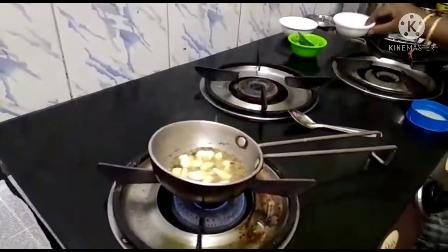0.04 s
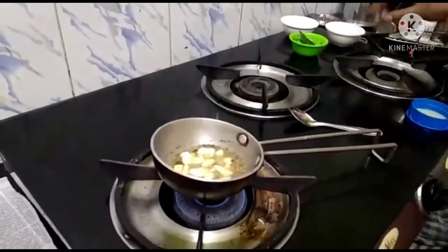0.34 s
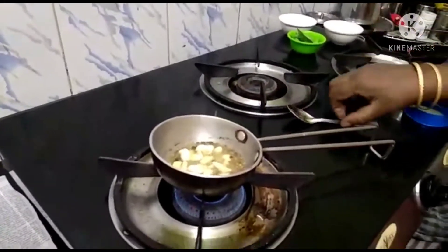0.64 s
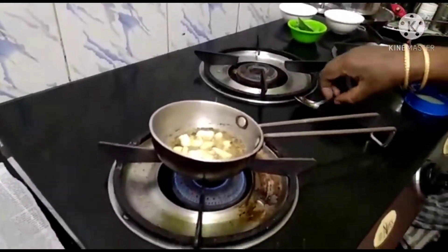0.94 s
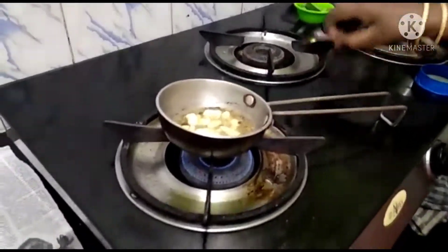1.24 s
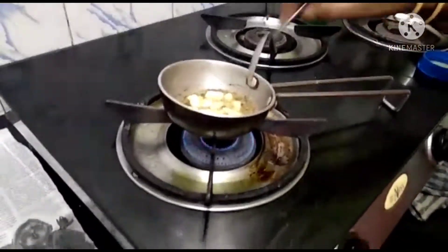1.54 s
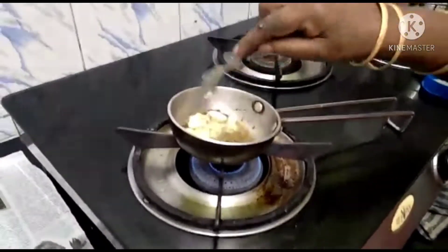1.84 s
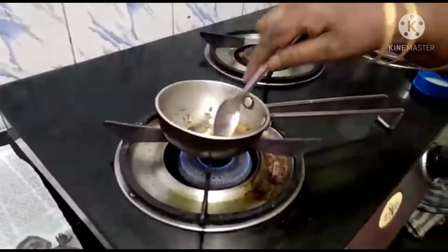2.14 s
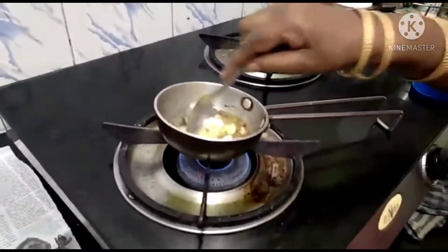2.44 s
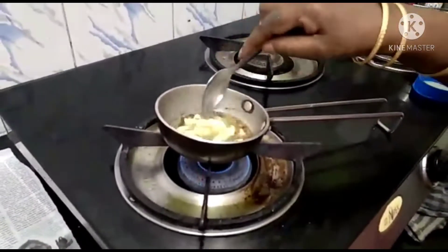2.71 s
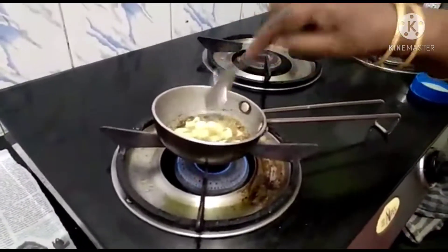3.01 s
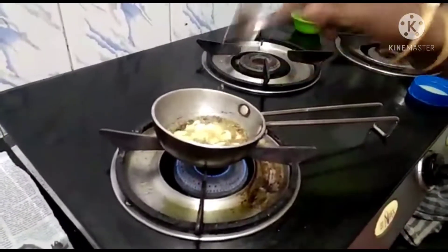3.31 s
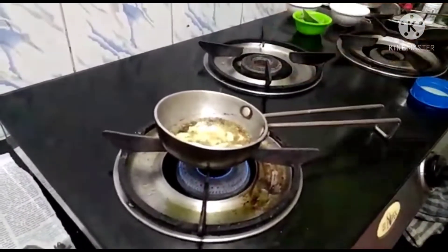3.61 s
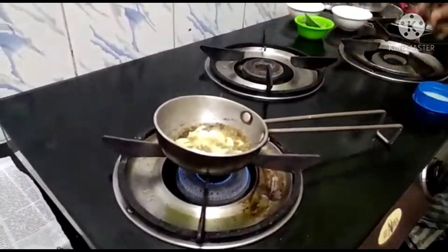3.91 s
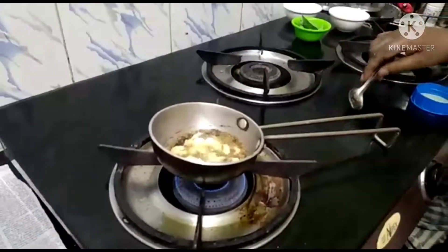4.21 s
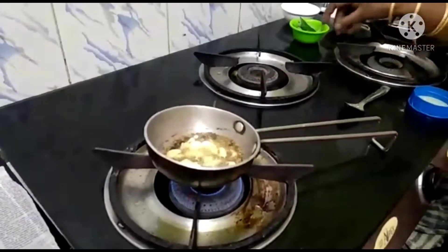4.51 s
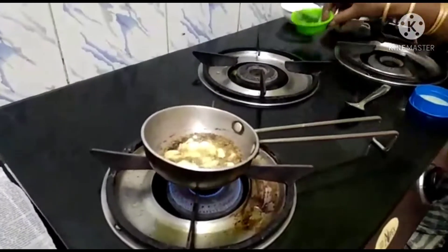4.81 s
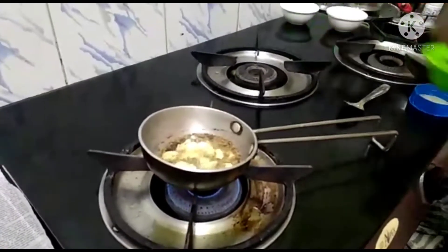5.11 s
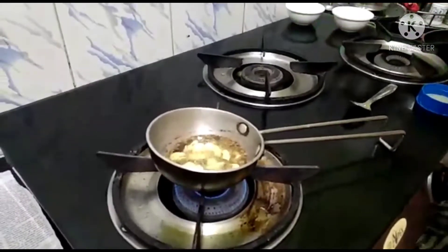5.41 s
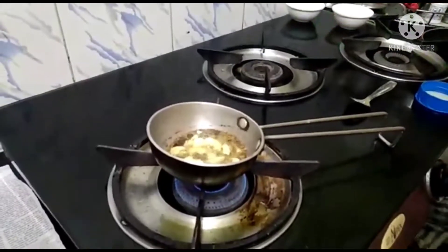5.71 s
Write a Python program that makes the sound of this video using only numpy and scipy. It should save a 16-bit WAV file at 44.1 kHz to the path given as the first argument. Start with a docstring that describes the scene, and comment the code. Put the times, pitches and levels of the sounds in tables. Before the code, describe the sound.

Nuts sizzle faintly in a pan as a bowl clanks down, a steel spoon clinks and stirs, then drops with a ringing clatter.

```python
"""Frying nuts in ghee

Nuts fry quietly in a small steel pan on a gas stove in a tiled kitchen, tiny steam bubbles popping.
A bowl clanks down on the stove and rocks to rest. A steel spoon is picked up, clinks and scrapes
round the pan, then drops on the stove top, where it bounces and rings."""
import sys
import numpy as np
from scipy import signal
from scipy.fft import rfft, irfft, next_fast_len
from scipy.io import wavfile
from scipy.ndimage import uniform_filter1d

SR = 44100
rng = np.random.default_rng(int(sys.argv[2]) if len(sys.argv) > 2 else 0)


def wav_out(sig):
    """Save sig, one row per channel (or a flat mono array), as 16-bit PCM at SR to the path in sys.argv[1]."""
    wavfile.write(sys.argv[1], SR, np.round(np.clip(np.atleast_2d(sig).T, -1, 1) * 32767).astype(np.int16))


N = 262395
TIME = np.arange(N) / SR
CUTOFF_HZ = 15550
HARD_CRACK = 1.5   # steel on steel: the clean crack against the slips around it
BOWL_BOUNCE_S, SPOON_BOUNCE_S = 0.011, 0.013


def from_db(db):
    """Decibels to gain."""
    return 10 ** (np.asarray(db) / 20)


def unit_energy(x):
    """Scale to an energy of one per channel."""
    return x / np.sqrt(np.mean(np.sum(x ** 2, axis=-1)) + 1e-20)


def unit_rms(x):
    """Scale to an rms of one."""
    return unit_energy(x) * np.sqrt(x.shape[-1])


def colour(x, spectrum):
    """EQ a sound with a smooth curve of (frequency [Hz], gain [dB])."""
    hz, db = np.transpose(spectrum)
    size = next_fast_len(x.shape[-1])
    bins = np.maximum(np.fft.rfftfreq(size, 1 / SR), 1)
    gain = from_db(np.interp(np.log(bins), np.log(hz), db))
    return irfft(rfft(x, size) * gain, size)[..., :x.shape[-1]]


def through(x, response):
    """Convolve with an impulse response."""
    return signal.fftconvolve(np.atleast_2d(x), np.atleast_2d(response), axes=-1)[:, :N]


def ringing(modes):
    """Impulse response of damped modes: the wider the mode, the shorter its ring."""
    t = TIME[:SR // 2]
    response = 0
    for k, (hz, width, db) in enumerate(modes):
        envelope = from_db(db) * width * np.exp(-np.pi * width * t)
        response += (-1) ** k * envelope * np.sin(2 * np.pi * hz * t)
    return unit_energy(response)


def dense_modes(force, spectrum):
    """Pass a force through crowded, quickly damped modes: a broad EQ of unit energy."""
    impulse = signal.unit_impulse(SR // 10, "mid")
    return colour(force, spectrum) / np.linalg.norm(colour(impulse, spectrum))


def swell(t, rise_s, fall_s):
    """An envelope that builds toward time zero, then dies away."""
    return np.exp(-np.logaddexp(-t / rise_s, t / fall_s))


def grains(per_s):
    """Random clicks of either sign, at an rms of one."""
    return unit_rms((rng.random(N) < per_s / SR) * rng.choice([-1, 1], N))


def add(track, s, sound):
    """Mix a sound in, centred on a time."""
    at = round(s * SR) - len(sound) // 2 + np.arange(len(sound))
    inside = (at >= 0) & (at < N)
    track[at[inside]] += sound[inside]


def contact(fall_s, rise_s, crack=0):
    """One touch: tiny slips thicken and die away; a hard touch has a clean crack in the middle."""
    t = np.arange(-(SR // 10), SR // 10) / SR
    slips = unit_energy(rng.standard_normal(len(t)) * swell(t, rise_s, fall_s))
    return unit_energy(slips + crack * signal.unit_impulse(len(t), "mid"))


def blows(times, levels_db, fall_s, rise_s, crack=0):
    """The force of a series of touches."""
    force = np.zeros(N)
    for s, db in zip(times, levels_db):
        add(force, s, from_db(db) * contact(fall_s, rise_s, crack))
    return force


def chatter(times, levels_db, losses_db, gap_s, fall_s, rise_s, crack=0):
    """The force of landings that each break into six uneven, ever weaker bounces."""
    bounce = np.arange(6)[:, None]
    bounce_times = times + gap_s * bounce * rng.uniform(.95, 1.05, bounce.shape)
    bounce_db = levels_db - losses_db * bounce
    return blows(bounce_times.ravel(), bounce_db.ravel(), fall_s, rise_s, crack)


def stereo(mid, side, bass_side_db, wide_above_hz=5040):
    """Mid and side to left and right: narrow in the bass, wide in the treble."""
    side = colour(side, [(wide_above_hz * .9, bass_side_db), (wide_above_hz, -3)])
    return np.array([mid + side, mid - side])


def flicker(depth_db, per_s):
    """A small random rise and fall in gain."""
    knots = rng.standard_normal(1000)
    return from_db(depth_db * np.interp(TIME * per_s, np.arange(len(knots)), knots))


# Tone of the frying ghee: (frequency [Hz], gain [dB])
SIZZLE_EQ = [(530, -47), (900, -31.5), (1100, -1), (1260, -12), (1600, -7.5), (1950, -4.5), (3000, -9.5),
             (3430, -2), (3800, -5), (4200, -2), (4900, -10.5), (5600, -11.5), (6900, -1.5), (7600, -4),
             (8900, 2), (9300, -5.5), (9900, -2.5), (10700, -0.5), (12700, -9), (13800, -7), (15500, -4)]

def sizzle(level_db=-59.5, pops_per_s=500, size_spread_db=2.5, pops_db=-7, bands=10):
    """Tiny steam bubbles burst in the ghee; the level flickers, each frequency band separately."""
    strengths = from_db(size_spread_db * np.minimum(rng.exponential(1, (2, N)), 4))
    pops = unit_rms(strengths * [grains(pops_per_s), grains(pops_per_s)])
    hiss = unit_rms(stereo(*rng.standard_normal((2, N)), bass_side_db=-20))
    spectrum = rfft(colour(hiss + from_db(pops_db) * pops, SIZZLE_EQ))
    band = np.arange(spectrum.shape[-1]) * SR / N // (CUTOFF_HZ / bands)
    frying = sum(irfft(spectrum * (band == k), N) * flicker(depth_db=2, per_s=32) for k in range(bands))
    return from_db(level_db) * flicker(depth_db=0.8, per_s=15) * unit_rms(frying)


# Tone of the gas flame: (frequency [Hz], gain [dB])
FLAME_EQ = [(29, -89), (50, -62), (119, -18), (145, -13), (199, -7), (313, 1), (353, -29.5), (414, -2),
            (548, 1), (578, -28), (617, 0.5), (764, -12), (1200, -21), (1560, -59.5), (2640, -120)]

def flame(level_db=-70):
    """The soft, low rush of the burner."""
    noise = stereo(*rng.standard_normal((2, N)), bass_side_db=-18)
    return from_db(level_db) * unit_rms(colour(noise, FLAME_EQ))


# Room tone of the kitchen: (frequency [Hz], level [dB])
HUM_TONES = [(283, -80), (316, -73.5), (543, -84.5), (615, -80)]

def hum(width_hz=6):
    """A faint, wavering hum: noise rings narrow resonances."""
    return sum(from_db(db) * unit_rms(through(rng.standard_normal(N), ringing([(hz, width_hz, 0)])))
               for hz, db in HUM_TONES)


# Bright ticks of spoon, bangles and bowls:
# (time [s], level [dB], decay [s], pitch [Hz], peak sharpness [factor])
LIGHT_TICKS = [(0.091, -6.5, 0.025, 3760, 1.8), (0.117, -2, 0.012, 8100, 1.5),
               (0.394, 3, 0.0041, 9200, 0.47), (0.435, -9.5, 0.0046, 8500, 0.38),
               (0.721, -15, 0.014, 8500, 0.13), (1.01, -12.5, 0.0057, 9100, 0.61),
               (1.293, -10, 0.0053, 8050, 0.64), (1.379, -11, 0.016, 8200, 0.8),
               (1.414, 7.5, 0.0021, 8800, 0.87), (2.514, -15.5, 0.0042, 8000, 1.4),
               (2.589, -19, 0.0067, 6900, 1.05), (3.05, -13.5, 0.0049, 6930, 0.99),
               (3.426, -10, 0.0049, 8950, 1.4), (3.53, -18.5, 0.004, 6870, 2.4),
               (4.135, 7, 0.0035, 7330, 1.4)]
# A tick's peak at a sharpness of one: (frequency [multiple of pitch], gain [dB])
TICK_EQ = [(0.02, -45), (0.08, -40), (0.25, -17.5), (0.52, -14), (0.998, 0.5), (1.502, -10), (2.2, -14.5)]
# Duller knocks of pan and dishes: (time [s], level [dB], decay [s], upper edge [Hz])
DISH_KNOCKS = [(0.036, -15.5, 0.0023, 4470), (0.409, -2.5, 0.082, 2030), (1.041, -20, 0.0047, 1880),
               (1.126, -6.5, 0.023, 4130), (2.214, -21.5, 0.0038, 1477), (2.951, -17.5, 0.0085, 700),
               (3.01, -44, 0.0091, 906), (3.496, -23.5, 0.0034, 1120), (3.594, -17.5, 0.0044, 5030),
               (4.226, -4.5, 0.0057, 1710), (4.318, -6, 0.0031, 2210), (4.408, -7.5, 0.0038, 4100),
               (4.621, -14, 0.0027, 7340)]
# Ring of the stove top: (frequency [Hz], width [Hz], level [dB])
STOVE_RING = [(484, 24, -3), (692, 30, -3), (1105, 110, -8), (1490, 55, -9), (1950, 200, -6)]

def clatter(gain_db=-1, stove_db=-14):
    """Ticks peak at their pitch, knocks are flat up to their edge; the stove rings faintly with both."""
    force = np.zeros(N)
    for s, db, fall_s, pitch_hz, sharpness in LIGHT_TICKS:
        eq = [(multiple * pitch_hz, sharpness * eq_db) for multiple, eq_db in TICK_EQ]
        add(force, s, from_db(db) * colour(contact(fall_s, rise_s=0.0028), eq))
    for s, db, fall_s, edge_hz in DISH_KNOCKS:
        eq = [(60, -45), (150, -19), (450, 0), (edge_hz, 0), (4 * edge_hz, -34)]
        add(force, s, from_db(db) * colour(contact(fall_s, rise_s=0.0072), eq))
    stove = from_db(stove_db) * through(force, ringing(STOVE_RING))
    return from_db(gain_db) * (force + stove)


# The bowl rattles down on its foot: (time [s], body level [dB], edge level [dB], loss per bounce [dB])
BOWL_HITS = [(0.173, -12, -22, 9), (0.179, -4.5, -16, 11), (0.19, -9, -17, 8), (0.213, -8.5, -19.5, 8),
             (0.229, -8, -20, 7), (0.256, -19, -30, 10), (0.266, -18, -29, 9)]
# Ring of its wall and of its edge: (frequency [Hz], width [Hz], level [dB])
WALL_RING = [(1741, 34, -4), (1869, 36, -4), (1935, 36, -4), (1971, 38, 0), (2010, 45, -3), (2110, 40, -6),
             (2221, 34, 0), (2341, 34, -5), (2457, 30, -1), (2483, 30, -3), (2538, 34, -5), (2618, 32, -2),
             (2777, 36, -9), (2889, 32, -3), (3070, 40, -11), (3318, 36, -10), (3645, 28, -2),
             (3668, 30, -1), (3900, 60, -10), (4080, 34, -11), (4307, 55, -9), (4430, 60, -10)]
EDGE_RING = [(4940, 150, -11), (6410, 45, 0), (6650, 120, -7), (7740, 50, -8), (8190, 70, 1), (8480, 45, 2),
             (8764, 35, -1), (10400, 90, 0), (10750, 150, -4), (11200, 35, 1), (11970, 70, 1),
             (15200, 70, -9)]
# Dense modes of its body and of its edge: (frequency [Hz], gain [dB])
BODY_EQ = [(100, -48), (250, -27.5), (400, -9.5), (520, -7.5), (900, -2.5), (1500, -0.5), (2100, 17.5),
           (3000, 6.5), (4400, -10.5), (5200, -10.5), (8000, -15.5), (16000, -45)]
EDGE_EQ = [(3000, -30.5), (4900, -9), (5700, -22), (6500, 4), (7400, -4.5), (8500, 15), (9500, -14.5),
           (10400, 5), (12000, -2.5), (13200, 0), (15500, -17.5)]

def bowl_clank(wall_db=14, stove_db=9, body_db=15.5, edge_db=15):
    """The bowl clanks down: its wall and the stove ring low, its edge rings high."""
    s, body, edge, loss = np.transpose(BOWL_HITS)
    touch = dict(gap_s=BOWL_BOUNCE_S, fall_s=0.0014, rise_s=0.0027, crack=HARD_CRACK)
    # the wall's ring and the body's clank each get their own noise, at the same hits
    ring_force, body_force = (chatter(s, body, loss, **touch) for _ in range(2))
    edge_force = chatter(s, edge + edge_db, loss, **touch)
    response = from_db(wall_db) * ringing(WALL_RING) + from_db(stove_db) * ringing(STOVE_RING)
    clank = through(ring_force, response) + from_db(body_db) * dense_modes(body_force, BODY_EQ)
    shimmer = through(edge_force, ringing(EDGE_RING)) + from_db(1) * dense_modes(edge_force, EDGE_EQ)
    return clank + shimmer


# Rolls of the bowl on its foot: (time [s], level [dB], decay [s])
BOWL_ROLLS = [(0.3, -39, 0.1), (0.492, -33.5, 0.024), (0.523, -27.5, 0.016), (0.555, -28.5, 0.011),
              (0.609, -31.5, 0.03)]
# Ring of the bowl against the stove: (frequency [Hz], width [Hz], level [dB])
ROLL_RING = [(479, 32, -10), (694, 32, -7), (1110, 60, -11), (1500, 35, -14), (1790, 90, -10),
             (2000, 60, -4), (2220, 35, -7), (2450, 60, -6), (2620, 30, -8), (2900, 45, -9),
             (3410, 170, -16), (4130, 200, -22)]

def bowl_rocking(ring_db=-5, body_db=-8, edge_db=-24, slips_per_s=800):
    """The bowl judders to rest, each roll a burst of slips that ring and rasp."""
    roll = sum(from_db(db) * swell(TIME - s, 0.0034, fall_s) for s, db, fall_s in BOWL_ROLLS)
    ring = from_db(ring_db) * through(roll * grains(slips_per_s), ringing(ROLL_RING))
    rasp = roll * grains(slips_per_s)
    body = from_db(body_db) * dense_modes(rasp, BODY_EQ)
    edge = from_db(edge_db) * dense_modes(rasp, EDGE_EQ)
    return ring + body + edge


def lone_rings(notes, rise_s, waver_hz):
    """Touches that each set one resonance singing, its pitch not quite steady."""
    track = np.zeros(N)
    t = np.arange(-(SR // 5), SR // 5) / SR
    for s, hz, db, fall_s in notes:
        waver = unit_rms(uniform_filter1d(rng.standard_normal(len(t)), size=400))
        tone = np.sin(2 * np.pi * np.cumsum(hz + waver_hz * waver) / SR)
        add(track, s, from_db(db) * swell(t, rise_s, fall_s) * tone)
    return track


# Squeaks of the rocking bowl: (time [s], pitch [Hz], level [dB], decay [s])
SQUEAKS = [(0.484, 1940, -33, 0.013), (0.523, 1957, -27.5, 0.016), (0.554, 2000, -24.5, 0.011),
           (0.59, 2027, -35, 0.042), (0.66, 1980, -36.5, 0.0093)]

def bowl_squeaks():
    """The foot sticks and slips, and the wall sings near one pitch."""
    return lone_rings(SQUEAKS, rise_s=0.0037, waver_hz=17)


# Fingers nudge and lift the spoon: (time [s], ring level [dB], knock level [dB], loss per bounce [dB])
LIFT_HITS = [(0.773, -30.5, -36, 5), (1.098, -28, -47, 20), (1.107, -21.5, -29, 3), (1.144, -32, -32.5, 12)]
# Choked ring of the held spoon: (frequency [Hz], width [Hz], level [dB])
HELD_RING = [(3620, 130, -14), (5440, 120, -11), (6770, 50, -12), (7820, 55, 2), (8860, 60, -2),
             (10300, 70, -10), (10800, 70, -1), (11220, 130, 2), (11900, 200, -11), (14600, 220, -10)]

def spoon_lift(ring_db=18):
    """Pinched in the fingers, the spoon rings briefly as it drags off the stove."""
    s, ring, _, loss = np.transpose(LIFT_HITS)
    force = chatter(s, ring + ring_db, loss, SPOON_BOUNCE_S, fall_s=0.0056, rise_s=0.0012, crack=0.29)
    return through(force, ringing(HELD_RING))


# Dense modes of the stove top: (frequency [Hz], gain [dB])
STOVE_EQ = [(80, -40), (200, -17), (550, 18.5), (900, -10), (1400, -32), (2200, 16.5), (4300, 15),
            (6000, 9.5), (9000, 18.5), (16000, -12.5)]

def stove_knocks(hits, knock_db=19, ring_db=-9):
    """The stove top answers each bounce of the spoon with a short knock."""
    s, _, knock, loss = np.transpose(hits)[:4]
    force = chatter(s, knock + knock_db, loss, SPOON_BOUNCE_S, fall_s=0.0035, rise_s=0.0068)
    return dense_modes(force, STOVE_EQ) + from_db(ring_db) * through(force, ringing(STOVE_RING))


# Spoon clinks on the pan, and strokes through the nuts: (time [s], level [dB])
CLINKS = [(1.412, -23), (1.725, -18.5), (2.591, -54), (3.243, -46)]
STROKES = [(1.92, -63.5), (2.17, -66.5), (2.28, -58.5), (2.32, -54.5), (2.36, -64), (2.5, -62),
           (2.699, -76.5), (2.96, -70), (3.07, -68), (3.251, -58), (3.45, -57)]
# Ring of the pan: (frequency [Hz], width [Hz], level [dB])
PAN_RING = [(1125, 50, -20), (1560, 150, -18), (2020, 350, -17), (3260, 170, -4), (3590, 220, 1),
            (3920, 340, -4), (4350, 220, -9), (6600, 150, -19), (8420, 200, -16)]
# Tone of nuts scraping and of nuts tumbling: (frequency [Hz], gain [dB])
SCRAPE_EQ = [(200, -34), (700, -35), (1800, 10), (2800, 5.5), (4000, -11), (5500, -3), (8000, -2),
             (11000, -9), (16000, -2.5)]
TUMBLE_EQ = [(120, -15), (300, -4), (550, 12), (850, -9.5), (1400, -26), (4000, 17), (12000, -24)]

def stirring(clink_db=10, scrape_db=-1, scrape_ring_db=-5, tumble_db=-70):
    """The spoon clinks on the pan and drags nuts in small slips; they tumble softly against its wall."""
    strokes = sum(from_db(db) * swell(TIME - s, rise_s=0.0095, fall_s=0.0169) for s, db in STROKES)
    slips = strokes * grains(per_s=1500)
    s, db = np.transpose(CLINKS)
    clinks = blows(s, db + clink_db, fall_s=0.0034, rise_s=0.0065, crack=0.94)
    while_stirring = (TIME > STROKES[0][0]) & (TIME < STROKES[-1][0])
    tumbles = grains(per_s=22) * rng.random(N) * while_stirring
    ring = through(clinks + from_db(scrape_ring_db) * slips, ringing(PAN_RING))
    scrape = from_db(scrape_db) * dense_modes(slips, SCRAPE_EQ)
    return ring + scrape + from_db(tumble_db) * dense_modes(tumbles, TUMBLE_EQ)


# The pan hits its support: (time [s], level [dB])
SHOVES = [(1.966, -7.5), (1.972, -7), (1.98, -14.5), (2.053, -30.5)]
# Ring of the pan on its support: (frequency [Hz], width [Hz], level [dB])
SUPPORT_RING = [(474, 40, 1), (834, 55, -7), (1750, 70, -6), (2140, 90, -2), (2930, 85, 1), (3700, 150, -5),
                (4090, 60, -1), (4740, 75, -2), (6220, 120, -5), (8100, 70, -4), (8380, 65, 0),
                (9310, 80, -3), (10700, 70, -7)]
# Dense modes of the clack: (frequency [Hz], gain [dB])
SUPPORT_EQ = [(150, -37), (450, 3), (2500, 3.5), (4500, 2), (7000, -4.5), (9000, -1), (12000, -2.5),
              (16000, -7)]

def pan_clack(gain_db=-3):
    """Shoved by the spoon, the pan clacks on its iron support."""
    s, db = np.transpose(SHOVES)
    force = blows(s, db, fall_s=0.0033, rise_s=0.0035, crack=0.4)
    return from_db(gain_db) * (through(force, ringing(SUPPORT_RING)) + dense_modes(force, SUPPORT_EQ))


# Landings of the dropped spoon: (time [s], ring level [dB], knock level [dB], loss per bounce [dB],
# damping by the stove [Hz], tilt [dB/octave])
DROP_HITS = [(4.321, -11.5, -37, 12, 8, 4), (4.331, -6.5, -22.5, 14, 10, -3.5),
             (4.341, -9, -32, 7, 10, -1.5), (4.405, -27, -45, 8, 12, -2), (4.428, -28, -45, 8, 12, -1),
             (4.449, -21, -36, 8, 20, 2), (4.459, -13, -22.5, 10, 45, 0), (4.471, -13, -34, 12, 18, -2),
             (4.48, -16, -34, 8, 24, -1), (4.511, -17, -27.5, 4, 110, 2), (4.532, -20, -34, 5, 70, 1)]
# Open ring of the free spoon: (frequency [Hz], width [Hz], level [dB])
SPOON_RING = [(3903, 7, -18), (4820, 90, -29), (5090, 18, -16), (6520, 40, -22), (6783, 20, -23),
              (7538, 16, -1.5), (7716, 18, -12), (7900, 50, -13), (8200, 200, -18), (8520, 60, -19),
              (8890, 40, -9), (10400, 100, -24), (10848, 40, -4), (10915, 30, -7), (11031, 24, 3),
              (11180, 55, -6), (11500, 200, -20), (11770, 35, -19), (13090, 35, -15), (14640, 120, -13),
              (15050, 200, -14)]

def spoon_drop(ring_db=19):
    """The dropped spoon rings high at every bounce, less freely as it settles."""
    touch = dict(gap_s=SPOON_BOUNCE_S, fall_s=0.0015, rise_s=0.0021, crack=HARD_CRACK)
    rings = 0
    for s, ring, _, loss, damping_hz, tilt_db in DROP_HITS:
        modes = [(hz, width + damping_hz, db + tilt_db * np.log2(hz)) for hz, width, db in SPOON_RING]
        rings += through(chatter(s, ring + ring_db, loss, **touch), ringing(modes))
    return rings


# Low end of the drop: (frequency [Hz], width [Hz], level [dB])
THUD_RING = [(114, 67, -7), (180, 110, -9), (275, 116, -10.5)]

def spoon_thud(at_s=4.324, gain_db=-6.5):
    """The spoon's full weight lands with one thud."""
    return from_db(gain_db) * through(signal.unit_impulse(N, round(at_s * SR)), ringing(THUD_RING))


# Pings of the bouncing spoon: (time [s], pitch [Hz], level [dB], decay [s])
PINGS = [(4.403, 3903, -33, 0.015), (4.511, 5110, -33, 0.016)]

def spoon_pings():
    """A glancing touch rings one note of the spoon alone."""
    return lone_rings(PINGS, rise_s=0.0027, waver_hz=4.1)


def kitchen(x, direct_db, early_db, tail_db, early_t60_s=0.06, tail_t60_s=0.28, tail_onset_s=0.0032):
    """Direct sound with phase-widened treble, quick reflections off stove and tiles, and a room tail."""
    t = TIME[:SR // 2]
    x = np.ravel(x)
    direct = stereo(x, np.imag(signal.hilbert(x)), bass_side_db=-37.5)
    early_decay = from_db(-60 * TIME[:SR // 20] / early_t60_s)
    early = through(x, stereo(reflections(early_decay), reflections(early_decay), bass_side_db=-34.5))
    tail_decay = unit_energy(from_db(-60 * t / tail_t60_s) * (1 - np.exp(-t / tail_onset_s)))
    tail = through(x, stereo(*rng.standard_normal((2, len(t))), bass_side_db=-36) * tail_decay)
    return from_db(direct_db) * direct + from_db(early_db) * early + from_db(tail_db) * tail


def reflections(decay, passes=4):
    """Dense echoes under a decay, evened out so that they favour no pitch."""
    echoes = rng.standard_normal(len(decay)) * decay
    for _ in range(passes):
        flat = irfft(np.exp(1j * np.angle(rfft(echoes))), len(decay))
        envelope = np.sqrt(np.abs(uniform_filter1d(flat ** 2, size=200)) + 1e-24)
        echoes = flat * decay / envelope
    return unit_energy(echoes)


# Stereo placement of the background bed: (frequency [Hz], left minus right [dB])
BED_BALANCE = [(60, -9), (240, -7), (950, -7.5), (3770, -5.5), (15000, -9.5)]

def to_the_right(x):
    """Lean a stereo sound to the right with opposite EQs on its channels."""
    hz, db = np.transpose(BED_BALANCE)
    return np.array([colour(channel, list(zip(hz, sign * db / 2))) for channel, sign in zip(x, (1, -1))])


def scene():
    """Metal in the room, the spoon drier than stove and dishes, over a bed of sizzle, flame and hum."""
    drop = spoon_drop()
    stove = bowl_clank() + bowl_rocking() + clatter() + pan_clack()
    stove += stove_knocks(LIFT_HITS) + stove_knocks(DROP_HITS)
    stove = kitchen(stove, direct_db=-4, early_db=-6, tail_db=-3)
    spoon = kitchen(drop + spoon_lift(), direct_db=-2, early_db=-11, tail_db=-10)
    pan = kitchen(stirring(), direct_db=-1, early_db=-11, tail_db=-14)
    dry_accents = bowl_squeaks() + spoon_thud() + spoon_pings()
    bed = to_the_right(sizzle() + flame() + hum())
    return stove + spoon + pan + dry_accents + bed


def record(dry, low_cut_hz=139, ceiling=1.1):
    """Deep bass is cut, a soft limiter rounds the loudest peaks, and the very top is cut steeply."""
    thin = signal.sosfilt(signal.butter(4, low_cut_hz, "high", fs=SR, output="sos"), dry)
    rounded = ceiling * np.tanh(thin / ceiling)
    return signal.sosfilt(signal.ellip(12, .1, 80, CUTOFF_HZ, fs=SR, output="sos"), rounded)


dry = scene()
out = record(dry)
wav_out(out)
```